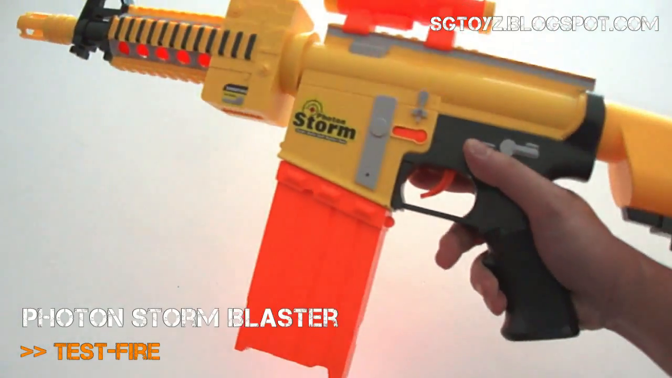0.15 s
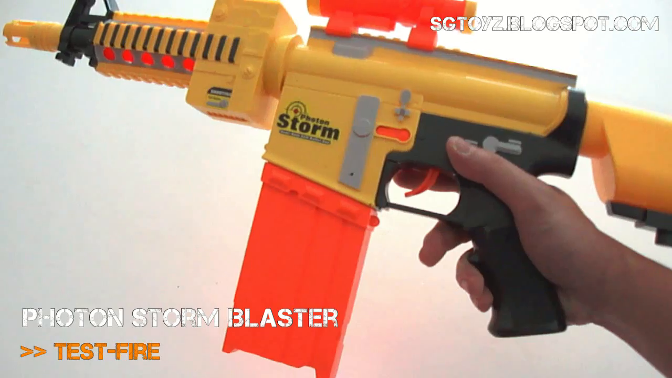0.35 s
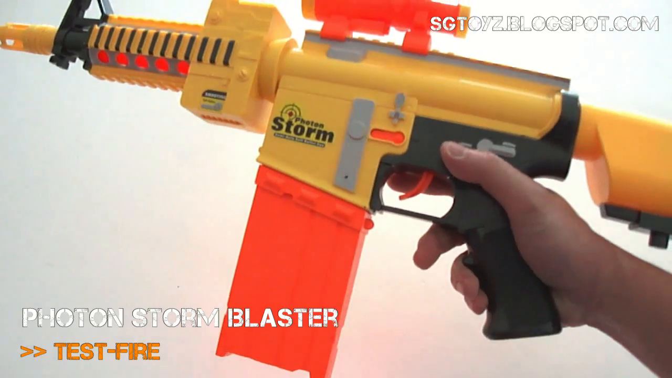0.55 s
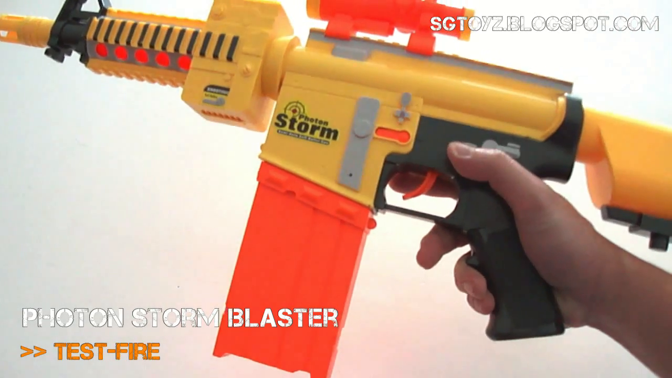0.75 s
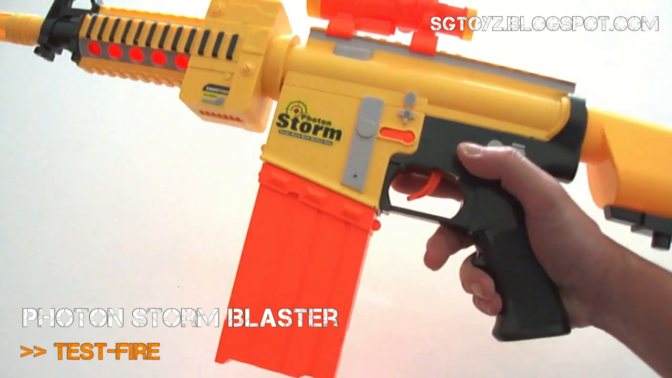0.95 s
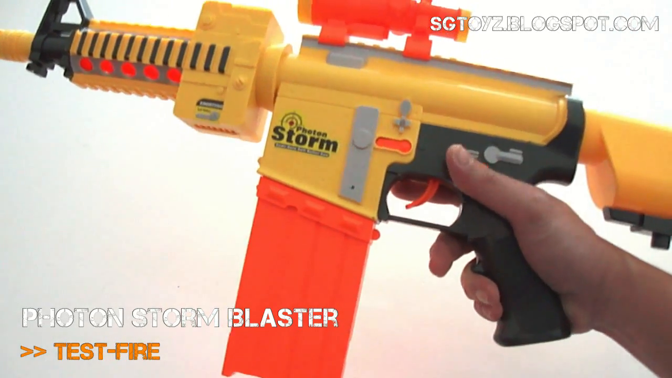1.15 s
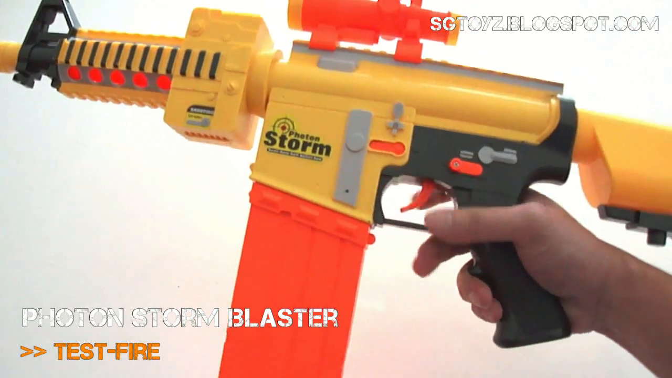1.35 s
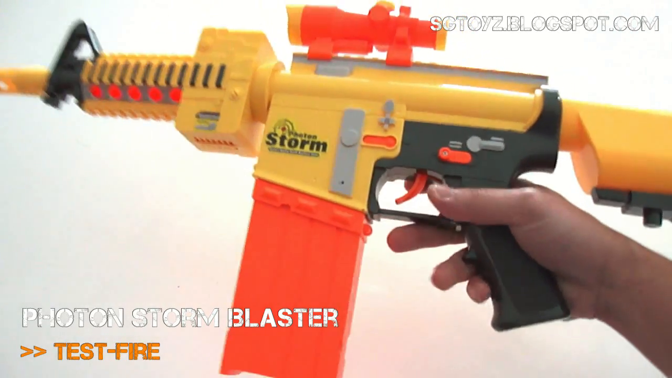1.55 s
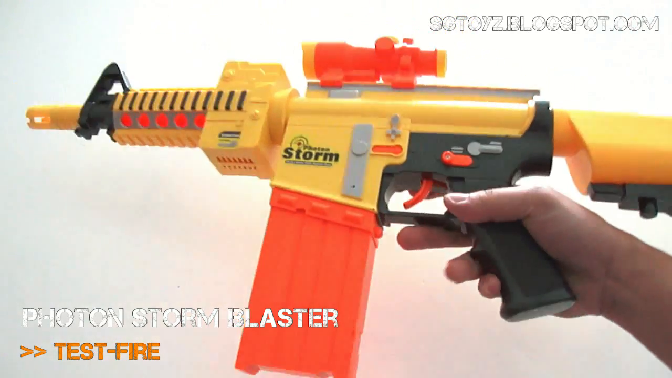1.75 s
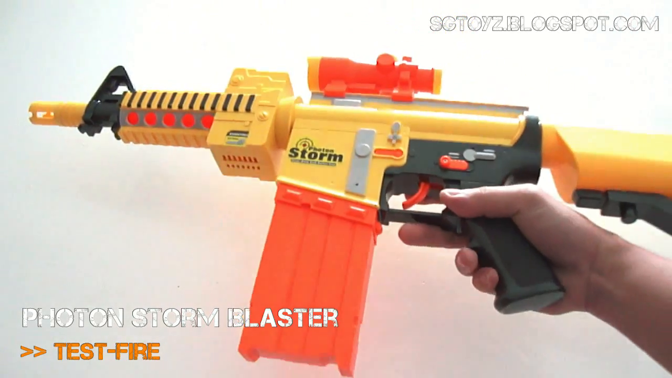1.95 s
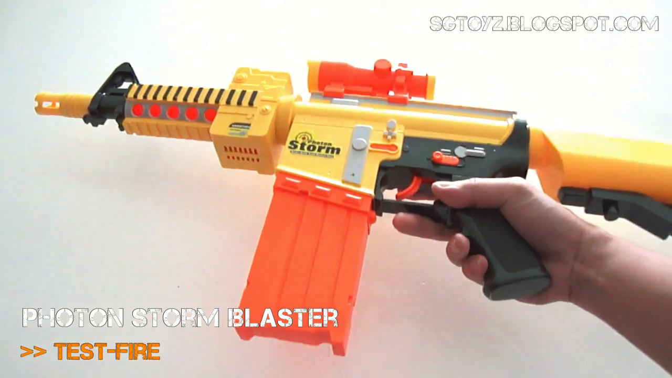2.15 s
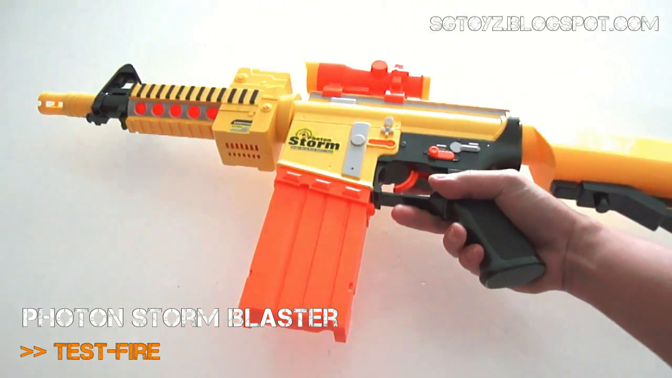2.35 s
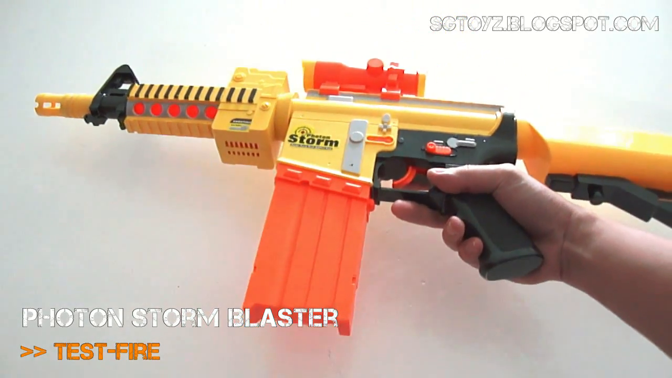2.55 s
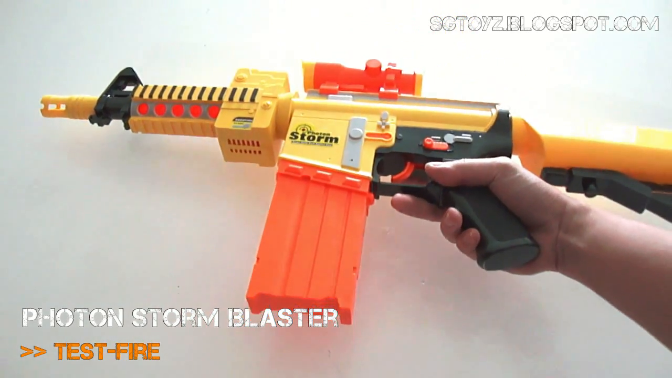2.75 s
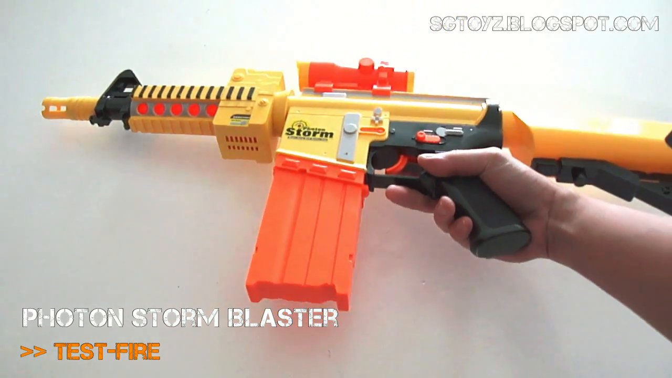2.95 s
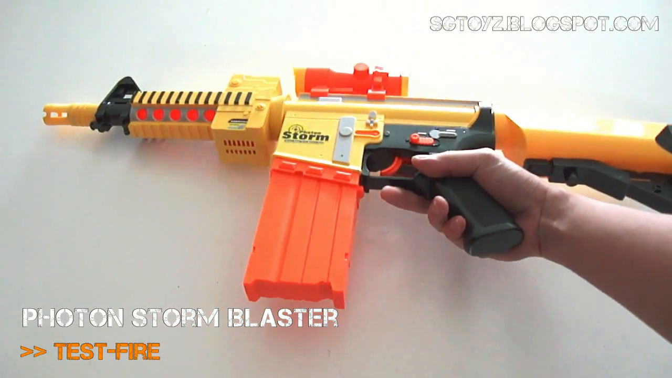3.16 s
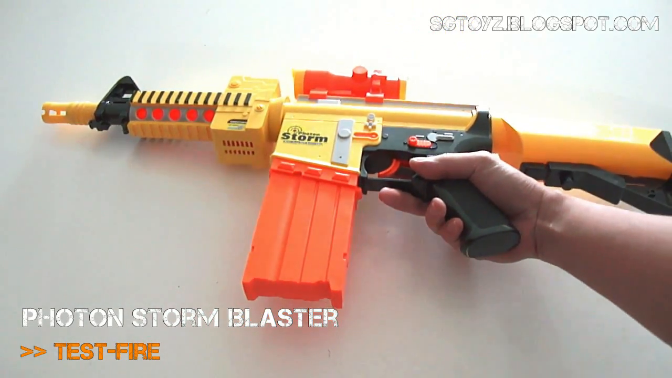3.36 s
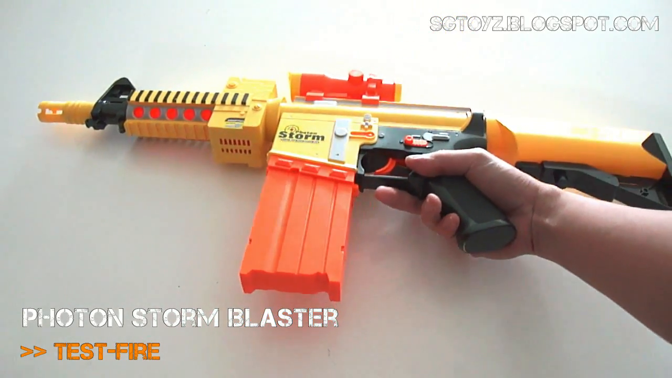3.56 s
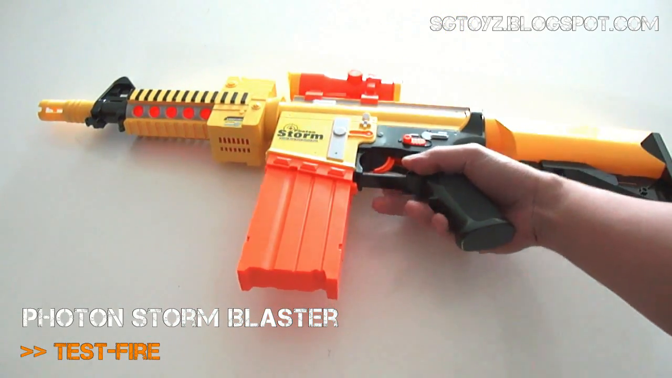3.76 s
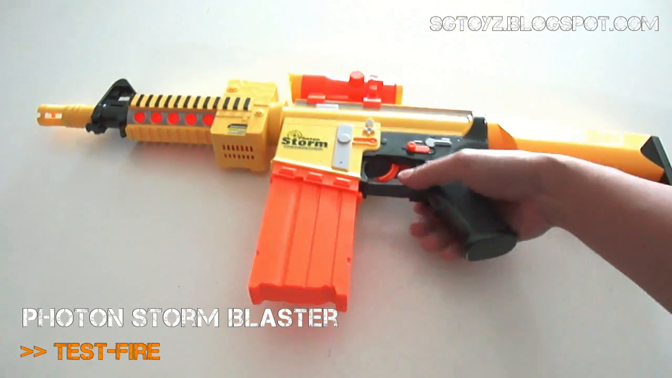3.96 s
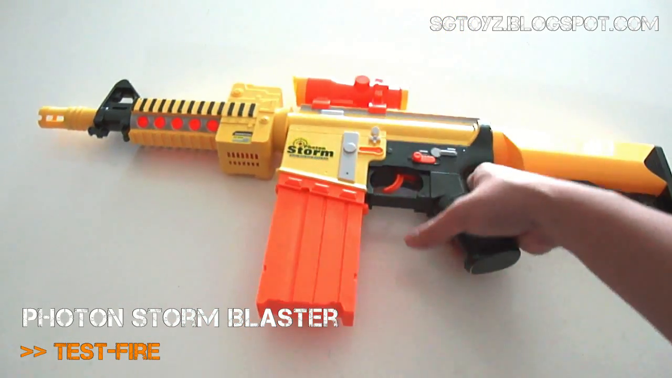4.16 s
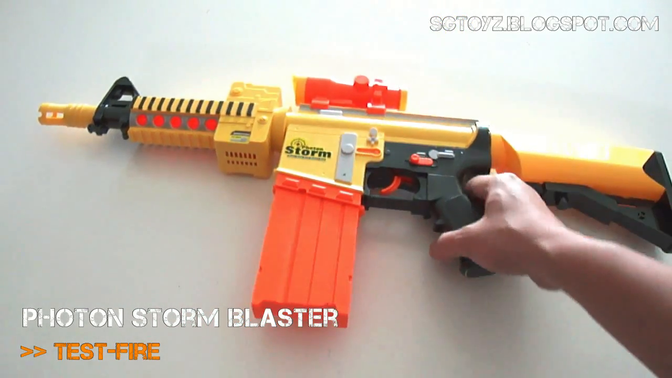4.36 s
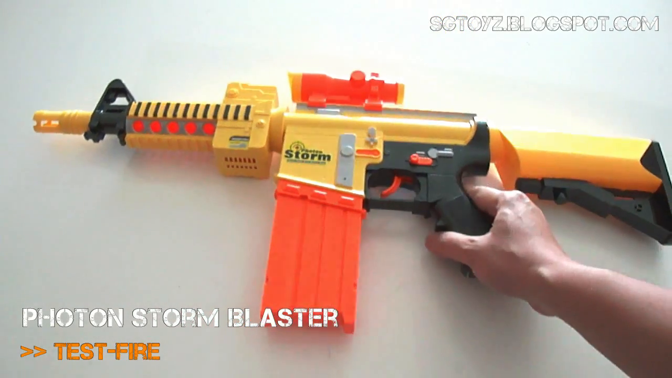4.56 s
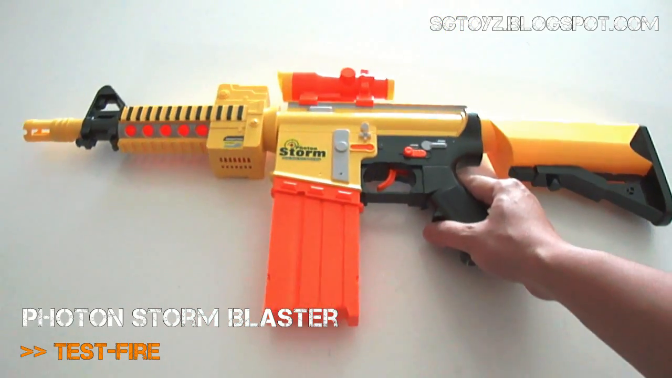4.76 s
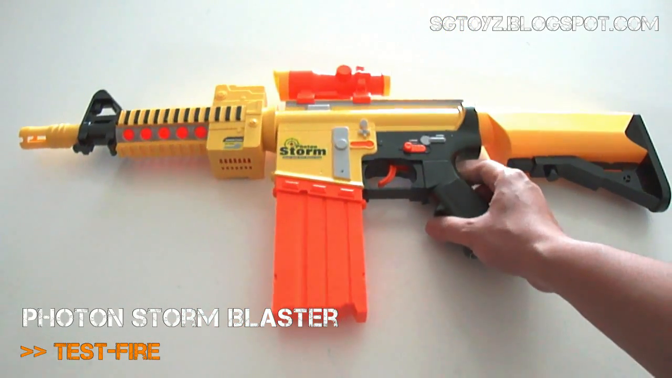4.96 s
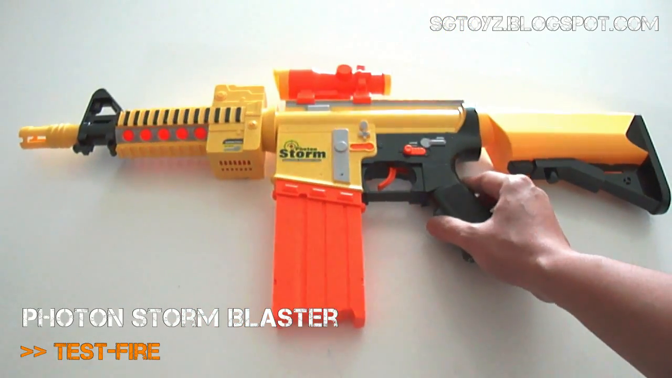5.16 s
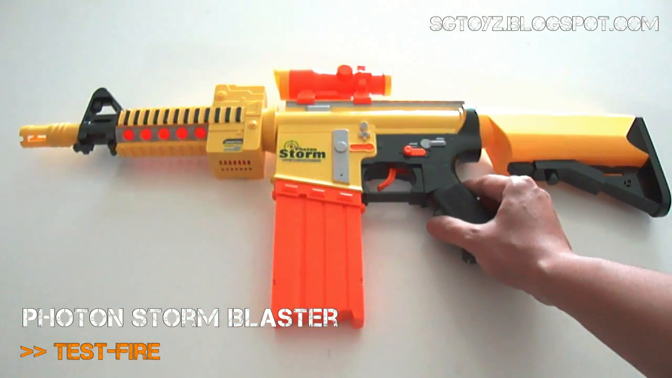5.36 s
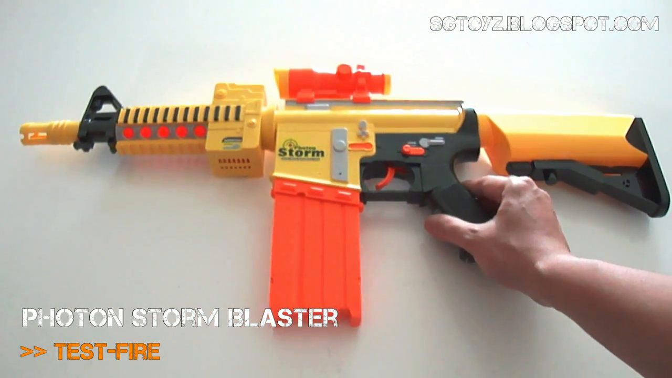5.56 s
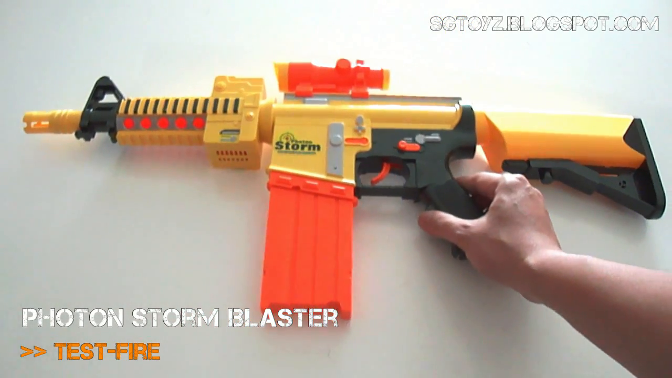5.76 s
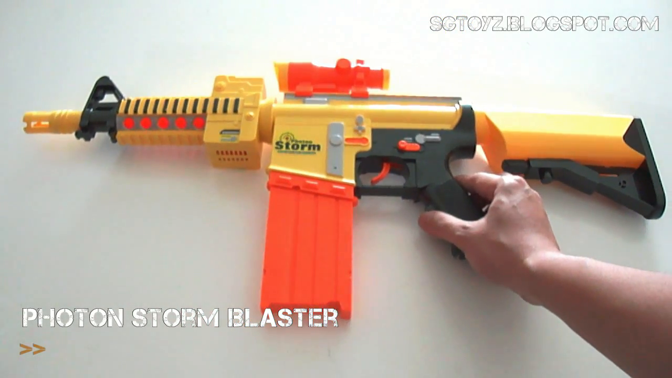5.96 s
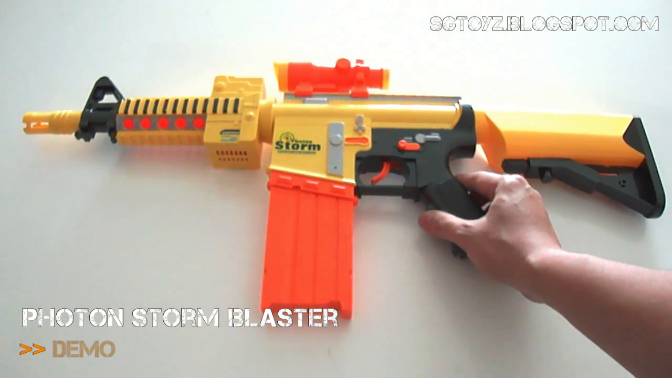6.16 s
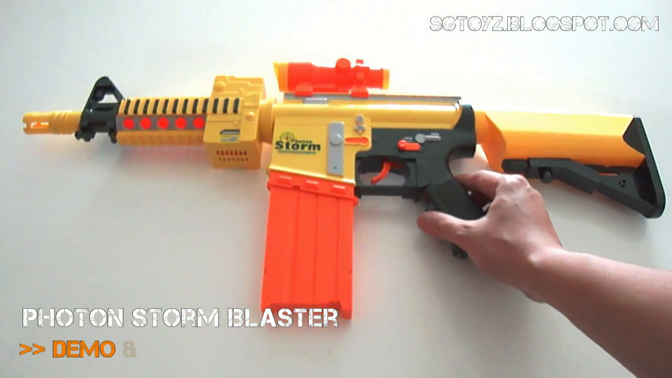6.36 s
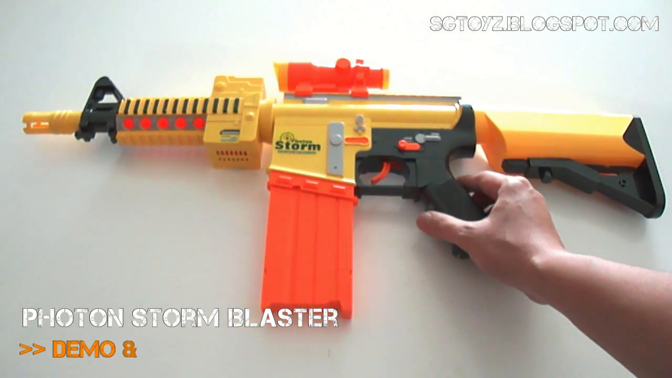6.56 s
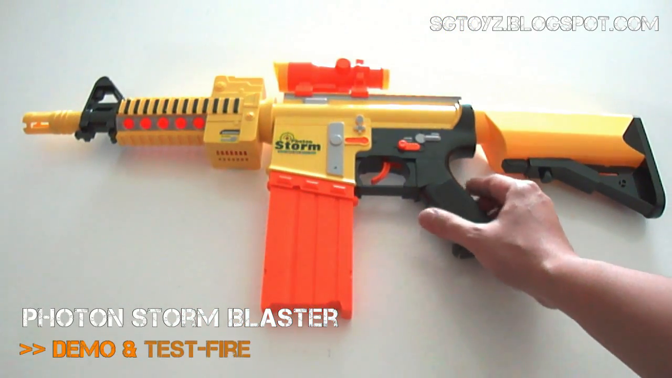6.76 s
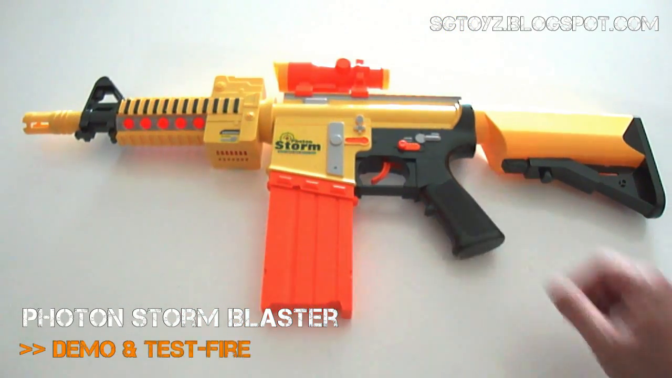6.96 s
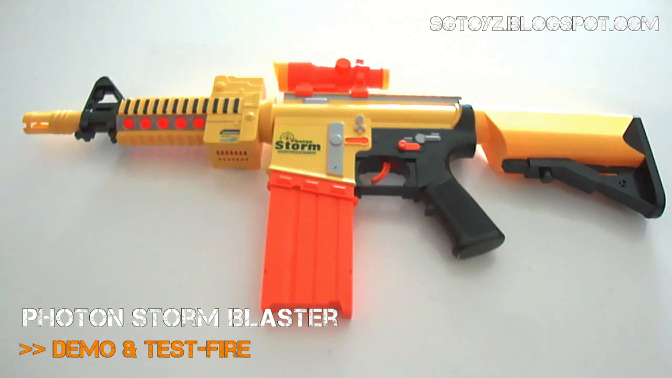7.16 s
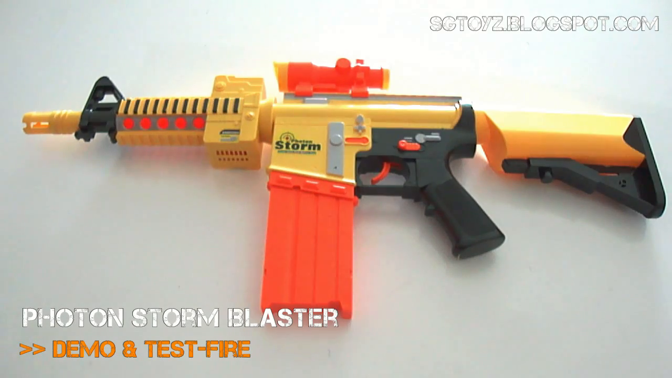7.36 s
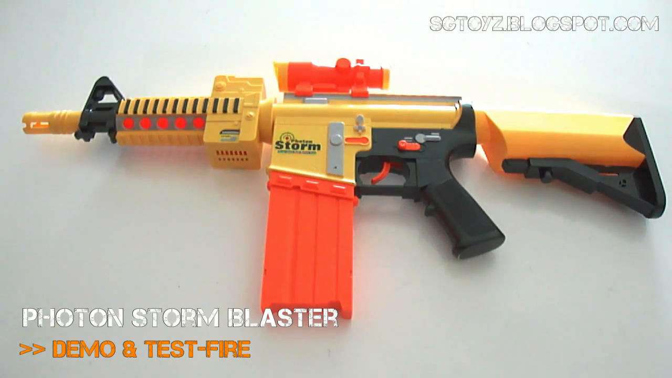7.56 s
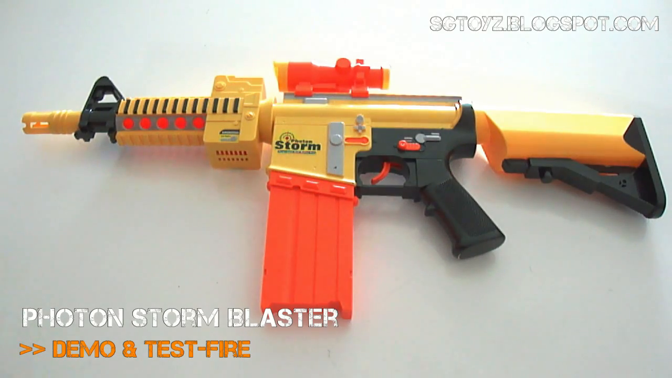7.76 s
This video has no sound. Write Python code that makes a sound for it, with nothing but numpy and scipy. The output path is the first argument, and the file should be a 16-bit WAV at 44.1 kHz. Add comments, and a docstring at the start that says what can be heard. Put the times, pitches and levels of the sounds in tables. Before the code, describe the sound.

Twin flywheel motors in a plastic toy gun whirr unevenly, coast down to a soft rattle, then sharp lever clicks, a hard clatter, and a later knock.

```python
"""A small, live room: the two flywheel motors of a plastic toy blaster run slightly out of step, so the
housing throbs and buzzes. Switched off, they coast down, their whine sinking to a soft rattle. A lever clicks,
the blaster clatters onto a table and later its grip drops with one more knock. Shaft angles drive pulses,
rubbing noise and sine overtones; knocks are decaying noise with ringing modes; the room is a noise tail."""
import sys
import numpy as np
from scipy import signal
from scipy.fft import rfft, irfft, next_fast_len
from scipy.io import wavfile
from scipy.ndimage import uniform_filter1d, map_coordinates

SR = 44100
rng = np.random.default_rng(int(sys.argv[2]) if len(sys.argv) > 2 else 0)


def store_wav(level_fs):
    """Save 16-bit WAV to argv[1]."""
    pcm = np.round(np.clip(np.atleast_2d(level_fs), -1, 1) * 32767)
    wavfile.write(sys.argv[1], SR, pcm.T.astype(np.int16))


N = 343929
TIME = np.arange(N) / SR  # [s]

# Levels are relative until scene() mixes the layers. "Order" is a multiple of the shaft rate;
# "motor" is 0 for the slower flywheel and 1 for the faster.

# steady tones under power: (order, motor, level [dB])
WHINE_TONES = [(9, 0, -43), (9, 1, -43), (12, 1, -46), (13, 0, -45), (13, 1, -47), (14, 1, -47),
               (15, 0, -45), (16, 0, -45), (17, 0, -46), (17, 1, -48), (18, 0, -42), (19, 0, -47),
               (19, 1, -49), (21, 1, -51), (25, 0, -50), (26, 0, -50), (33, 0, -56), (36, 1, -58)]
# low tones under power that swell once a beat:
# (order, pitch between the motors [0-1], level [dB], swing [dB], place of the swell in the beat [0-1])
THROB_TONES = [(2, 1, -48.5, 4, .55), (3, .4, -36.5, 7, .08), (4, .2, -36, 6.5, .12), (5, 0, -33.5, 4, .1),
               (6, .5, -38, 7.5, .5), (7, .6, -40, 3, .05), (8, .5, -40.5, 3, .1)]
# commutator squeals, before the radiation of the motor can: (order, level [dB])
COMMUTATOR_TONES = [(27, -48), (28, -48), (30, -39.5), (33, -44.5), (36, -50), (39, -50), (40, -50),
                    (42, -44.5), (45, -47), (48, -46), (51, -44)]
# how the motor can radiates the squeals: (frequency [Hz], level [dB])
CAN_RADIATION = [(3000, -28), (4400, -17), (4700, -8), (5000, -16), (5250, -1), (5500, 1.5), (5750, -5),
                 (6000, -4), (6400, -6), (6800, -19), (7700, -25), (7950, -14), (8300, -25), (11000, -30)]
# overtones that glide through a resonance of the housing:
# (order, motor, resonance [Hz], width [Hz], level [dB])
SINGING_OVERTONES = [(4, 1, 915, 36, -22), (4, 0, 810, 23, -24), (8, 0, 1635, 44, -24),
                     (5, 1, 950, 35, -31), (2, 1, 392, 23, -42.5), (5, 1, 762, 28, -35.5),
                     (9, 0, 964, 70, -32.5), (10, 0, 962, 150, -32), (11, 0, 1350, 37, -41.5),
                     (25, 1, 3300, 220, -54)]
# how much slower the other flywheel turns, the rate of their beat: (time [s], difference [turns/s])
BEAT_RATE = [(0, 4.1), (.4, 4.4), (.9, 5), (1.12, 3.9), (1.3, 5.9), (1.55, 6.7), (2, 4.3), (2.5, 2.4),
             (3.1, .4), (3.5, 0)]

# resonances of the housing, its loose panels and the motor cans: (frequency [Hz], width [Hz], level [dB])
SHELL_MODES = [(492, 120, -10.5), (760, 23, 4), (906, 88, 7.5), (1260, 270, -14)]
PANEL_MODES = [(1250, 400, 7), (1610, 170, 8), (1900, 240, 5.5), (2520, 220, 0)]
CAN_MODES = [(2550, 170, 2), (3110, 130, -3), (3980, 240, -3), (4650, 350, -8), (5550, 280, -2),
             (7940, 220, -9), (9350, 280, -15)]
# shaft speeds around which the bearing, chatter and brush sounds swell or sink:
# (speed [turns/s], width [turns/s], bearing gain [dB], chatter gain [dB], brush gain [dB])
SPEED_SWELLS = [(225.4, 7.7, 13, 8.5, 2), (217.8, 9.5, -23, -11, -1.5), (210.2, 5.3, 0, 10, 1),
                (114, 16, 4.5, -5, 2), (83, 10.6, -8, -34, 3.5), (63, 10, 5.5, 0, 1.5)]
# colour of brush friction: (frequency [Hz], level [dB per Hz])
BRUSH_COLOUR = [(170, -33), (330, -9.5), (700, 3), (1500, 0), (2400, -2.5), (3200, -2), (4400, -2),
                (5000, -5), (5800, -7), (6600, -7), (7500, -12), (8000, -14.5), (8700, -13), (11000, -18)]
# colour of the clean whirr of the coasting shafts: (frequency [Hz], level [dB])
WHIRR_COLOUR = [(200, -30), (320, -15), (400, 0), (450, -3), (500, 2.5), (580, -3.5), (680, -2), (760, 2),
                (850, 0), (980, 5), (1130, 3), (1330, 3.5), (1560, 2), (1700, -4), (1900, 2), (2200, -4),
                (2550, 0), (3000, -1), (3300, -12), (5000, -38)]

# plastic knocks, the crack and then the ring of the part that is struck:
# (time [s], level [dB], treble [dB], upper-mid [dB], bass [dB], crack t60 [s],
#  part frequency [Hz], part level re crack [dB], part t60 [s])
KNOCK_EVENTS = [(3.6727, -12.5, 2.5, -7.5, -9, 0.033, 518, -5.5, 0.043),
                (3.6755, -14.5, -12, 9.5, 1, 0.033, 1677, 1, 0.042),
                (3.6835, -16, 1, -8, 2.5, 0.023, 508, -10.5, 0.17),
                (3.7025, -28.5, 14, -2, 8, 0.025, 2200, -11, .05),
                (3.913, -30, 1, -4, -10, 0.13, 960, -2.5, 0.057),
                (3.938, -26.5, 0, -8, -10, 0.039, 970, -6, 0.057),
                (4.189, -32, 1, -1, 8, 0.17, 1070, -6, 0.045),
                (4.2295, -8, -8.5, -2.5, 0, 0.026, 1390, 0.5, 0.022),
                (4.2423, -9.5, 4, 3, 4, 0.019, 402, -13.5, 0.2),
                (4.2538, -18, 0, 3, -8, 0.01, 1250, -12, .06),
                (4.2612, -17, 4, 0, -4, 0.014, 2900, -12, .02),
                (4.3225, -17, -7, 2, 7, 0.013, 1490, -12, 0.028),
                (4.3305, -18, -8, 0, -3, 0.011, 1250, -5, .03),
                (4.4465, -28, 7, 1, 0, .012, 1940, -12, .03),
                (4.2717, -18.5, -7, -7, -13, 0.018, 2830, 0, 0.051),
                (4.414, -8.5, 2.5, 8.5, 11.5, 0.044, 1540, -4, .04),
                (4.4175, -19, 1, 4, 7, 0.018, 1171, -2, 0.1),
                (4.4285, -16, -1, 4, -8, 0.049, 203.5, -14.5, 0.18),
                (5.801, -19, 11, 7, 2, 0.027, 2024, -7, 0.074),
                (5.803, -12, -2, 2, -1, 0.011, 892, -11, 0.078),
                (5.8063, -19, -2, 6, -3, .02, 1480, -4, 0.11),
                (7.549, -33.5, -23, 2, 1, 0.021, 1500, -10, 0.039)]
# runs of small contacts as loose parts rattle:
# (start [s], length [s], level [dB], treble [dB], upper-mid [dB], bass [dB])
CLATTER_RUNS = [(3.419, 0.035, -35.5, 5, -6, -6.5), (4.262, .075, -19, 6, 10, 7),
                (4.432, .045, -27, 1, 2, -0.5)]
# colour of a plastic contact: (frequency [Hz], level [dB per Hz])
CONTACT_COLOUR = [(40, -65), (95, -17.5), (150, -16), (230, -6), (380, 2.5), (600, 0), (950, 4), (1600, -1),
                  (2400, -2.5), (3500, -6), (5500, -12.5), (7500, -22.5), (11000, -32)]
# ringing of the hollow body: (frequency [Hz], level [dB], t60 [s])
BODY_MODES = [(487, -4, .4), (883, 2, .45), (1141, -1, .35), (1491, 7, .3), (1739, 1, .3), (2422, 0, .21),
              (2659, -3, .3)]
# reverberation: (frequency [Hz], t60 [s])
ROOM_DECAY = [(150, 0.94), (400, 0.58), (1000, 0.61), (2800, 0.65), (5000, 0.6), (10000, 0.33)]
# colour of the room noise: (frequency [Hz], level [dB per Hz])
AIR_COLOUR = [(15, -56), (25, -42), (58, -13), (92, -21), (121, -5.5), (160, -12), (197, -1.5), (267, -2),
              (296, -3.5), (505, -2), (1060, -3), (1140, -4.5), (6780, -17.5), (11000, -22), (14300, -101),
              (22000, -120)]

# faster flywheel: speed under power [turns/s], switch-off [s], air drag time [s],
# dry friction [turns/s lost each second]
RUN_HZ, OFF_S, DRAG_S, FRICTION_HZ_PER_S = 243.3, 1.13, 3.05, 41.7
LEAD_START = -.57  # initial lead of the faster flywheel [turns]; at whole turns both shake in step
# layer levels referred to full speed [dB], and the power of speed by which two of them fall
BEARING_DB, CHATTER_DB, BRUSH_DB = -40, -31.5, -31.5
CHATTER_POWER, BRUSH_POWER = 1.4, 0.75
# around and below this speed [turns/s] the shafts settle in their bearings; power of speed of the fade
SETTLE_HZ, SETTLE_POWER = 43.7, 2.3
# speed above which the housing shakes loose [turns/s], steepness of that step, layer gains then [dB]
LOOSE_HZ, LOOSE_STEEPNESS = 183, 18
LOOSE_BEARING_DB, LOOSE_CHATTER_DB, LOOSE_BRUSH_DB = 8.5, 2.5, 6
# swing of the loose housing with each beat [dB]; panels also slap midway, as the flywheels oppose
THROB_BEARING_DB, THROB_CHATTER_DB, MIDWAY_CHATTER_DB = 3.5, 3.5, .5
SQUEAL_STOP_HZ = 105  # squeals die below this speed [turns/s]
# whirr: level [dB], power of speed by which it falls, the faster motor's part [dB], unevenness [dB]
WHIRR_DB, WHIRR_POWER, WHIRR_FAST_DB, FLUTTER_DB = -32.5, .2, -3, 1.6
# dulled whirr: cutoff [Hz], and the shares of full speed where it is wholly dull and wholly bright
DULL_HZ, DULL_PACE, BRIGHT_PACE = 1330, .35, .5
# clatter contacts: crack t60 [s], level scatter [dB], and the typical ring of a rattling part
CLATTER_T60_S, CLATTER_SCATTER_DB = 0.05, 3
LOOSE_PART_HZ, LOOSE_PART_DB, LOOSE_PART_T60_S = 1466, -16, 0.049
RING_DB = -32  # hollow body's ring re crack
PART_ROOM_DB = -5  # the small struck part feeds the room less than the whole body does
TOP_HZ = 11200  # band limit


def amp(db):
    """Definition of the decibel: amplitude ratio from level."""
    return 10 ** (np.asarray(db) / 20)


def unit(x):
    """Normalization to an rms of 1."""
    return x / np.sqrt(np.mean(x ** 2) + 1e-20)


def even(x):
    """Short-time normalization: the running rms is held near 1."""
    power = np.abs(uniform_filter1d(x ** 2, size=3500))
    return x / np.sqrt(power + 1e-6 * np.mean(x ** 2))


def along(points, hz):
    """Interpolation of (frequency, value) points on a logarithmic frequency axis."""
    f, v = np.transpose(points)
    return np.interp(np.log(hz + 1), np.log(f + 1), v)


def curves(rows):
    """Linear interpolation in time: one value per sample for each column after the time."""
    s, *columns = np.transpose(rows)
    return [np.interp(TIME, s, column) for column in columns]


def wobble(rate):
    """Slow random modulation: a smooth curve through random knots, rate of them a second."""
    coarse = np.linspace(0, TIME[-1], 8192)
    knots = rng.standard_normal(int(N * rate / SR) + 4)
    return np.interp(TIME, coarse, map_coordinates(knots, [coarse * rate]))


def filtered(x, response):
    """Linear filtering: the spectrum is multiplied by a response of frequency."""
    m = next_fast_len(len(x) + SR // 4)
    spectrum = rfft(x, m) * response(np.fft.rfftfreq(m, 1 / SR))
    return irfft(spectrum, m)[:len(x)]


def resonate(x, modes, alternate=True):
    """Modal superposition: resonances of alternating or like sign, with weak radiation below the lowest."""
    sign = -1 if alternate else 1
    low_hz = 0.36 * modes[0][0]

    def response(f):
        total = 0
        for k, (centre, width, db) in enumerate(modes):
            damping = 1j * f * width
            total = total + sign ** k * amp(db) * damping / (centre * centre - f * f + damping)
        return total * f ** 4 / (f ** 4 + low_hz ** 4)
    return filtered(x, response)


def causal(gain):
    """Minimum phase: the folded cepstrum gives the sharpest impulse response with this gain."""
    cepstrum = irfft(np.log(np.maximum(gain, 1e-6)))
    half = len(cepstrum) // 2
    folded = np.r_[cepstrum[0], 2 * cepstrum[1:half], np.zeros(half)]
    return irfft(np.exp(rfft(folded)))


def contacts(turns, angles, sizes, jitter, scatter_db):
    """Periodic impacts: pulses at the same angles of every turn, uneven in timing (turns) and strength."""
    marks = np.arange(1, int(turns[-1]))[:, None] + angles
    jittered = marks + jitter * rng.standard_normal(marks.shape)
    at = np.interp(jittered, turns, np.arange(N)).ravel()
    force = (sizes * amp(scatter_db * rng.standard_normal(marks.shape))).ravel()
    # each pulse is shared between its two neighbouring samples
    i, part = at.astype(int), at % 1
    early = np.bincount(i, force * (1 - part), N + 1)
    late = np.bincount(i + 1, force * part, N + 1)
    return (early + late)[:N]


def rub(turns, depth):
    """Amplitude-modulated friction: noise that swells once a turn."""
    return unit(rng.standard_normal(N) * np.exp(depth * np.cos(2 * np.pi * turns)))


def knock(turns, order_low, order_high):
    """Harmonic summation: one band-limited pulse a turn, a little uneven in strength."""
    u = turns - np.round(turns)
    count = order_high - order_low + 1
    pulse = np.sinc(count * u) / np.sinc(u) * np.cos(np.pi * (order_low + order_high) * u)
    return unit(pulse * amp(wobble(110)))


def line(k, turns):
    """Rotational overtone: a sine at k times the shaft rate, slightly unsteady in level."""
    return np.sqrt(2) * np.sin(2 * np.pi * (k * turns + rng.random())) * amp(2 * wobble(30))


def ambience():
    """Stationary noise: coloured quiet room noise with a thin electrical whistle."""
    air = unit(filtered(rng.standard_normal(N), lambda f: amp(along(AIR_COLOUR, f))))
    whistle = np.sin(2 * np.pi * (7900 * TIME + 0.16 * wobble(40)))
    return amp(-54.0 + 0.18 * wobble(0.09)) * air + amp(-78.0) * whistle


def room(x):
    """Diffuse reverberation: convolution with noise whose every frequency dies at its own speed."""
    hz, t, z = signal.stft(rng.standard_normal(SR * 3 // 4), SR, nperseg=256)
    decay = amp(-60 * t / along(ROOM_DECAY, hz)[:, None])
    tail = signal.istft(z * decay, SR, nperseg=256)[1]
    tail *= 1 - np.exp(-(np.arange(len(tail)) / SR / 0.0021) ** 2)  # soft onset
    return signal.fftconvolve(x, tail / np.linalg.norm(tail))[:len(x)]


def coast():
    """Damped rotation: the faster shaft runs steadily, then air drag and dry friction brake it."""
    reserve = FRICTION_HZ_PER_S * DRAG_S
    decay = np.exp(-np.maximum(TIME - OFF_S, 0) / DRAG_S)
    return np.maximum((RUN_HZ + reserve) * decay - reserve, .5)


def settle_db(speed):
    """Power-law fade as the slowing shafts settle in their bearings."""
    return -10 * np.log10(1 + (SETTLE_HZ / speed) ** (2 * SETTLE_POWER))


def looseness(speed):
    """Threshold behaviour: how far the housing has shaken loose, 0-1."""
    return 1 / (1 + (LOOSE_HZ / speed) ** LOOSE_STEEPNESS)


def levels(speed, lead):
    """Speed-dependent excitation: bearing, panel and brush levels [dB] follow the shaft speed and the beat."""
    pace_db = 20 * np.log10(speed / RUN_HZ)
    loose = looseness(speed)
    beat = 2 * np.pi * lead
    bearing_swing = THROB_BEARING_DB * np.cos(beat)
    panel_swing = THROB_CHATTER_DB * np.cos(beat) + MIDWAY_CHATTER_DB * np.cos(2 * beat)
    bearing = BEARING_DB + settle_db(speed) + loose * (LOOSE_BEARING_DB + bearing_swing)
    panels = CHATTER_DB + CHATTER_POWER * pace_db + loose * (LOOSE_CHATTER_DB + panel_swing)
    brush = BRUSH_DB + BRUSH_POWER * pace_db + settle_db(speed) / 2 + loose * LOOSE_BRUSH_DB
    swells = sum(np.outer(gains_db, np.exp(-((speed - hz) / width) ** 2))
                 for hz, width, *gains_db in SPEED_SWELLS)
    return np.array([bearing, panels, brush]) + swells


def bearings(slow, fast, shake, loose):
    """Rotating imbalance: each shaft knocks once a turn; at speed the joint shake makes the bearings rattle."""
    force = knock(slow, order_low=5, order_high=44) + amp(-4) * knock(fast, order_low=5, order_high=44)
    knocking = even(resonate(force, SHELL_MODES))
    rattle = even(resonate(np.abs(shake) * rub(slow, depth=1.0), SHELL_MODES))
    sound = (1 - .85 * loose) * knocking + (.2 + .65 * loose) * rattle
    return even(filtered(sound, lambda f: 1 / (1 + (f / 1900) ** 4)))


def chatter(slow, fast, shake, loose):
    """Vibro-impact: loose panels slap once per cycle of the joint shake; at low speed they follow the shafts."""
    turns = np.maximum.accumulate(slow + np.angle(shake) / (2 * np.pi))
    slaps = np.abs(shake) * contacts(turns, np.zeros(1), 1, jitter=.02, scatter_db=3)
    follow = knock(slow, order_low=6, order_high=44) + amp(-6) * knock(fast, order_low=6, order_high=44)
    force = loose * even(slaps) + (1 - loose) * follow
    force += (.35 + 1.15 * loose) * rub(turns, depth=.8)
    return even(resonate(force, PANEL_MODES))


def brushes(slow, fast, pace):
    """Sliding contact: brushes tick over three commutator segments and the same rough spots every turn."""
    def rotor(turns):
        segments = contacts(turns, np.arange(3) / 3, 1, jitter=.001, scatter_db=2)
        spot_angles, spot_sizes = rng.random(size=12), rng.standard_normal(size=12)
        spots = contacts(turns, spot_angles, spot_sizes, jitter=.0006, scatter_db=1.3)
        return amp(-14) * even(segments) + even(spots)

    ticks = even(rotor(slow) + amp(-3) * rotor(fast))
    force = ticks + (.35 + 1.05 * pace ** 4) * rub(slow, depth=.6)
    hiss = even(filtered(force, lambda f: amp(along(BRUSH_COLOUR, f))))
    can_ring = even(resonate(force, CAN_MODES, alternate=False))
    # as the rubbing slows, the ring of the motor cans takes over
    return even(hiss + amp(3 - 16 * pace) * can_ring)


def tones(slow, fast, speed, pace):
    """Harmonic radiation: imbalance hum, the whine under power and the commutator's glides."""
    hum = .6 * np.sin(2 * np.pi * slow) + np.sin(2 * np.pi * (fast - .1))
    lead = fast - slow
    pulled = slow + .02 * np.sin(2 * np.pi * lead)  # the beat pulls the low tones' pitch to and fro
    whine = np.zeros(N)
    for k, side, db, swing_db, place in THROB_TONES:
        swell = amp(db + swing_db * np.cos(2 * np.pi * (lead - place)))
        whine += swell * line(k, pulled + side * lead + 0.093 / k * wobble(28.4))
    for k, side, db in WHINE_TONES:
        whine += amp(db) * line(k, slow + side * lead)
    glides = sum(amp(db + along(CAN_RADIATION, k * np.abs(speed))) * line(k, slow)
                 for k, db in COMMUTATOR_TONES)
    squealing = (1 - .7 * pace ** 14) * speed ** 30 / (speed ** 30 + SQUEAL_STOP_HZ ** 30)
    return amp(-40) * pace ** 7.5 * hum + whine * pace ** 14 + glides * squealing


def singing(slow, fast, speed, fast_speed):
    """Resonance passage: overtones swell and fade as the falling speed carries them through a mode."""
    out = np.zeros(N)
    for k, side, hz, width, db in SINGING_OVERTONES:
        turns, rate = (fast, fast_speed) if side > .5 else (slow, speed)
        order = round(k)
        swell = amp(db) / (1 + (2 * (order * rate - hz) / width) ** 2)
        out += swell * line(order, turns + .05 / order * wobble(40))
    return out


def whirr(slow, fast, pace):
    """Source and filter: fluttering shaft overtones glide down through the housing's colour and grow duller."""
    def rotor(turns, count, size):
        overtones = np.r_[0, np.exp(2j * np.pi * rng.random(count))]
        play = .004 * wobble(45)  # the shaft's play in its bearings [turns]
        wave = np.interp(turns + play, np.arange(size) / size, irfft(overtones, size), period=1)
        return unit(wave) * amp(FLUTTER_DB * wobble(35))

    def colour_db(f):
        ripple_db = 3 * np.interp(f, np.arange(140) * 40, rng.standard_normal(140))
        return along(WHIRR_COLOUR, f) + ripple_db

    both = rotor(slow, count=32, size=1024) + amp(WHIRR_FAST_DB) * rotor(fast, count=32, size=1024)
    bright = filtered(both, lambda f: amp(colour_db(f)))
    dull = filtered(bright, lambda f: 1 / (1 + (f / DULL_HZ) ** 12))
    share = np.interp(pace, [DULL_PACE, BRIGHT_PACE], [0, 1])
    coasting = pace ** WHIRR_POWER * (1 - pace ** 6)  # silent at full speed
    return even(share * bright + (1 - share) * dull) * coasting


def motors():
    """Beating of two rotors: both run and coast to rest, giving their rattle and their clean tones."""
    fast_speed, (beat_hz,) = coast(), curves(BEAT_RATE)
    speed, pace = fast_speed - beat_hz, fast_speed / RUN_HZ
    lead = LEAD_START + np.cumsum(beat_hz) / SR
    knock_db, chatter_db, brush_db = levels(speed, lead)
    # shaft angles [turns], slightly unsteady
    slow = np.cumsum(speed * (1 + .0007 * wobble(14))) / SR
    fast = slow + lead + .006 * wobble(12)
    shake = 1 + .75 * np.exp(2j * np.pi * lead)  # phasor sum of the two imbalances
    loose = looseness(speed)
    running = amp(knock_db) * bearings(slow, fast, shake, loose)
    running += amp(chatter_db) * chatter(slow, fast, shake, loose)
    running += amp(brush_db) * brushes(slow, fast, pace)
    clean = tones(slow, fast, speed, pace) + singing(slow, fast, speed, fast_speed)
    clean += amp(WHIRR_DB + 2 * settle_db(speed)) * whirr(slow, fast, pace)
    return running, clean


def blows(count):
    """Random impact sequence: each plastic knock, and count unevenly spaced contacts per clatter."""
    rows = list(KNOCK_EVENTS)
    for start, length, db, *colour in CLATTER_RUNS:
        times = start + length * (np.arange(count) + rng.random(count)) / count
        for s in times:
            level = db + CLATTER_SCATTER_DB * rng.standard_normal()
            part_hz = LOOSE_PART_HZ * 2 ** rng.uniform(-0.89, 1)
            rows.append((s, level, *colour, CLATTER_T60_S, part_hz, LOOSE_PART_DB, LOOSE_PART_T60_S))
    return rows


def knocks():
    """Impact excitation: a short dense crack, the struck part's ring and a faint ring of the hollow body."""
    out, t = np.zeros(N + SR), np.arange(2 ** 14) / SR
    hz = np.fft.rfftfreq(len(t), 1 / SR)
    for s, db, treble_db, mid_db, bass_db, t60, part_hz, part_db, part_t60 in blows(count=14):
        force = rng.standard_normal(len(t)) * amp(-60 * t / t60)
        force[0] += 5  # the first touch
        tilt = along([(300, bass_db), (900, 0), (1700, mid_db), (6000, treble_db)], hz)
        colour = along(CONTACT_COLOUR, hz) + tilt
        crack = signal.fftconvolve(force, causal(amp(colour)))[:len(t)]
        crack /= np.sqrt(np.mean(crack[t < .004] ** 2))
        ring = sum(amp(level + rng.normal(0, 1) - 60 * t / life) * np.sin(2 * np.pi * (f * t + rng.random()))
                   for f, level, life in BODY_MODES)
        part = amp(db + part_db - 60 * t / part_t60) * np.cos(2 * np.pi * part_hz * t)
        hit = np.pad(amp(db - 7.5) * (crack + amp(RING_DB) * ring), (0, SR // 2))
        part = np.pad(part, (0, SR // 2))
        # each contact gets its own random room tail
        answer = room(hit + amp(PART_ROOM_DB) * part)
        out[round(s * SR):][:len(hit)] += hit + part + amp(-3.5) * answer
    return out[:N]


def scene():
    """Superposition of direct and reverberant sound, alike in both channels."""
    running, clean = motors()
    motor_room = room(amp(-5) * running + amp(-11) * clean)
    mono = amp(-2) * running + clean + motor_room + knocks() + ambience()
    return np.array([mono, mono])


def record(dry):
    """Band limitation: a steep low-pass at TOP_HZ, 150 Hz wide."""
    def low_pass(f):
        return np.clip((TOP_HZ - f) / 150 + .5, 0, 1)
    return np.array([filtered(channel, low_pass) for channel in dry])


dry = scene()
out = record(dry)
store_wav(out)
```